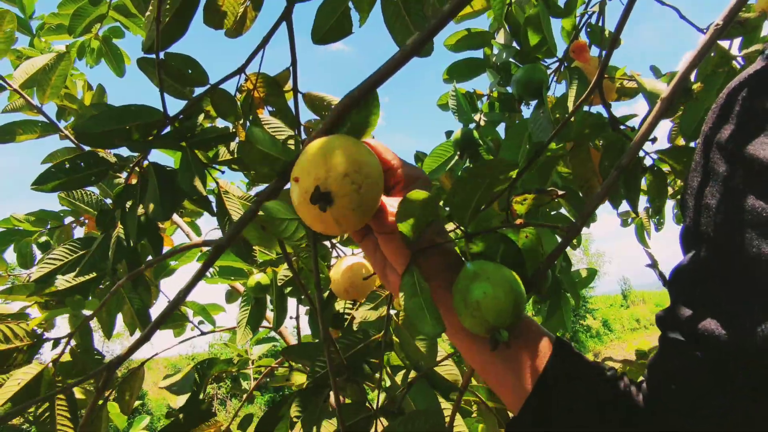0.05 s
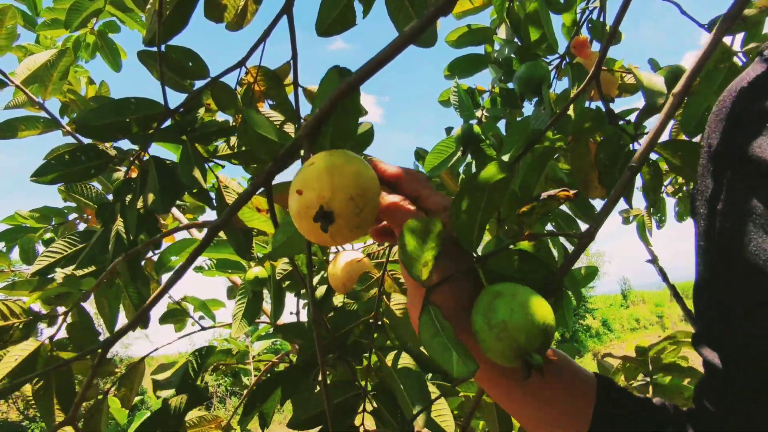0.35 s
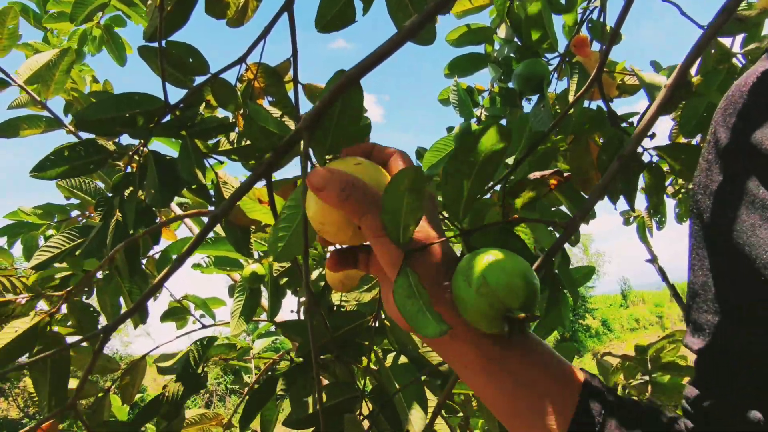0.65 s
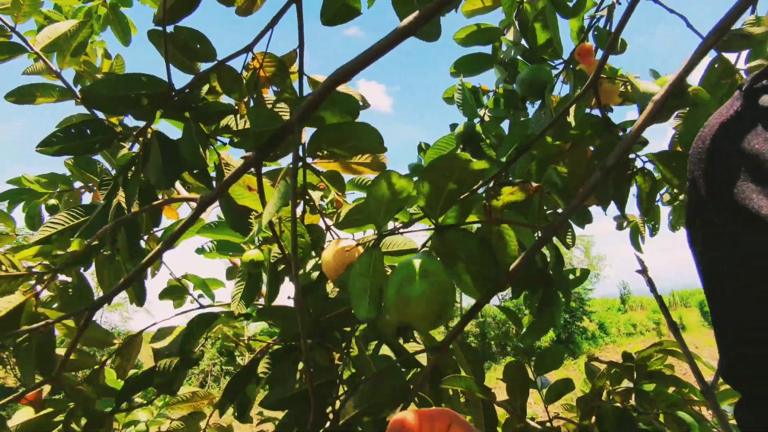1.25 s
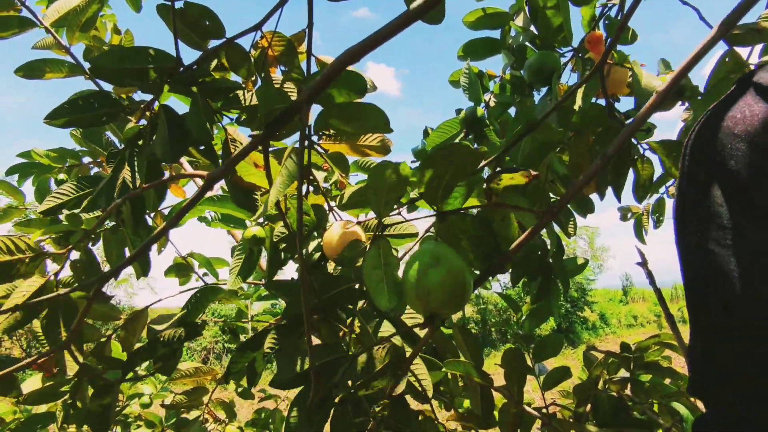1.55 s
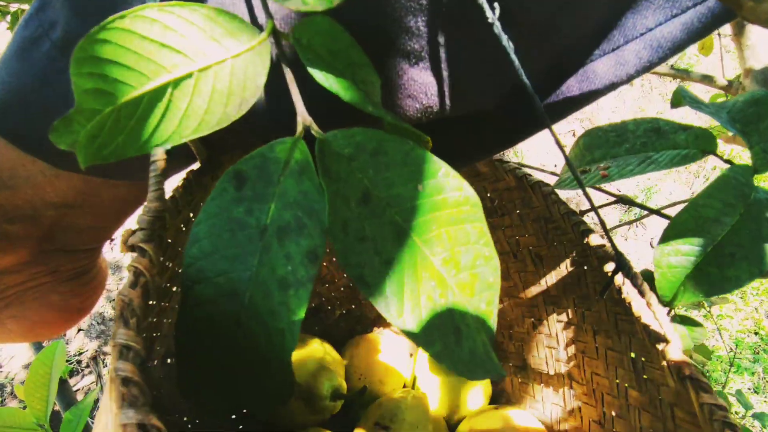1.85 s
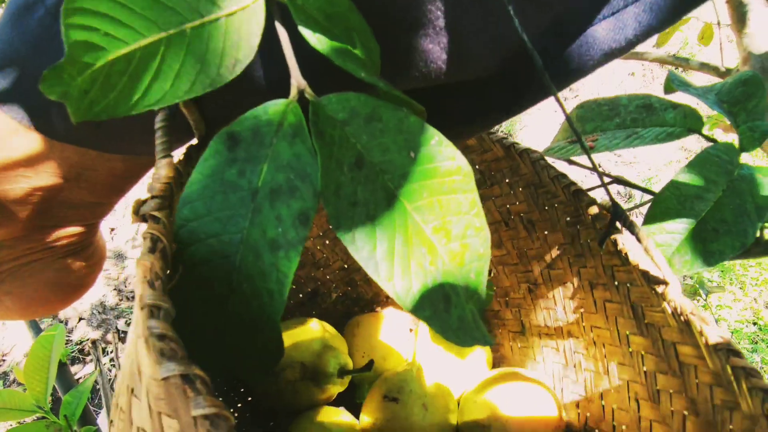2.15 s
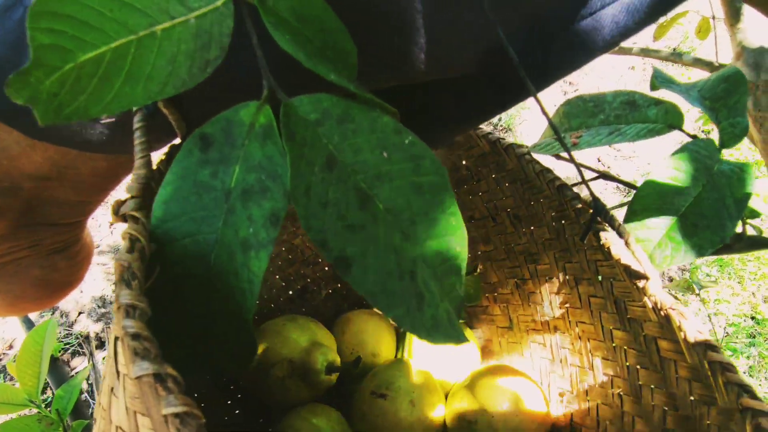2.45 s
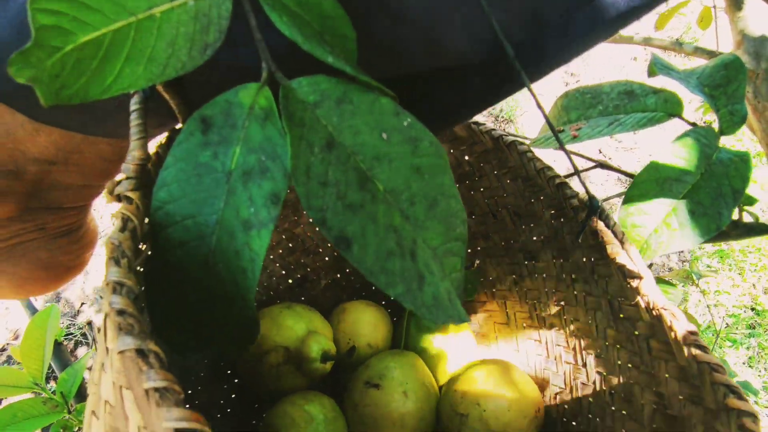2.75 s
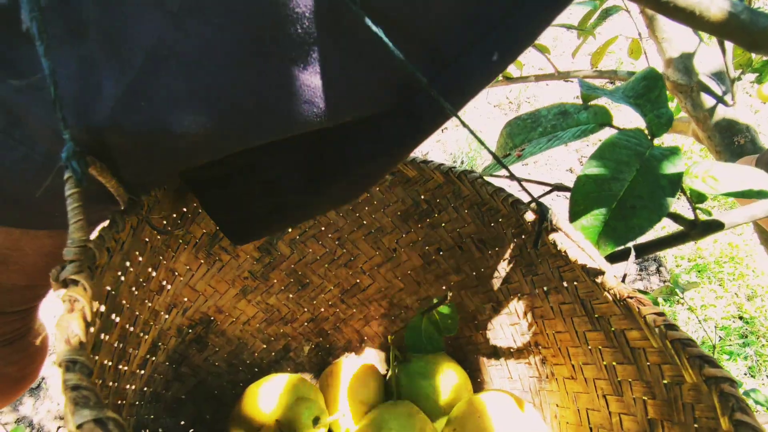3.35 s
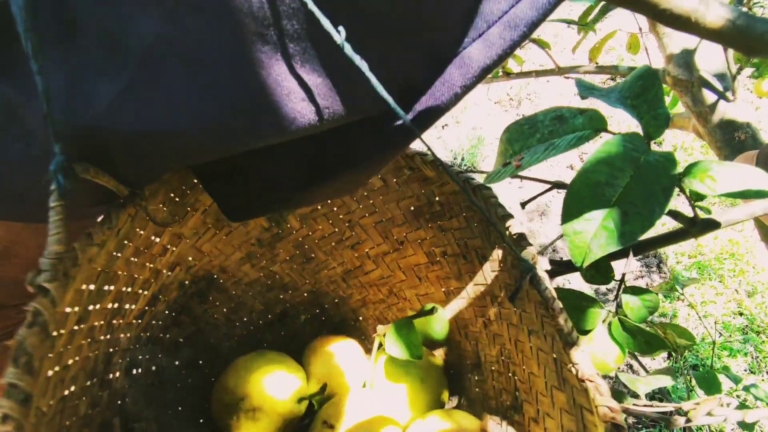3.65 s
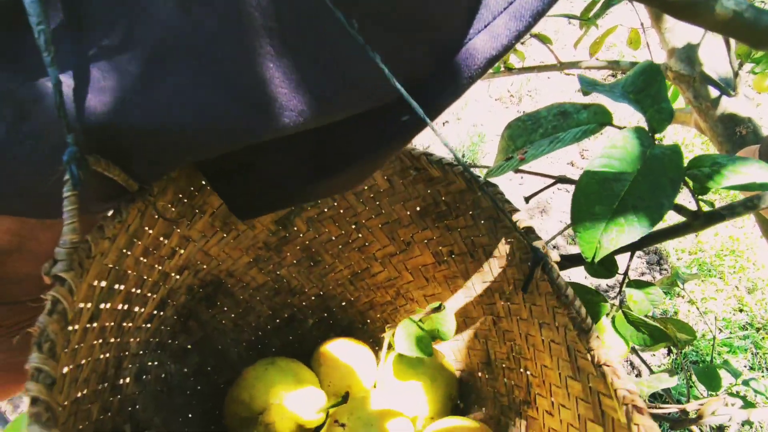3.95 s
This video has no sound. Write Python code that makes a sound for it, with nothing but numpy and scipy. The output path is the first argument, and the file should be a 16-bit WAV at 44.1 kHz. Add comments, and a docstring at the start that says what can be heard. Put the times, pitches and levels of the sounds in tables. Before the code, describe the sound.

Leaves rustle as fruit is picked, then fruit tumbles into a woven basket.

```python
"""Leaves rustle close by as a guava is twisted off: the stalk snaps and the branch swings back.
After a brief silence, leaves brush over a woven basket; after another, fruit tumbles in with
damped knocks, and the cane weave rings, crunches and ticks under the weight.
Rustle and crunch are surfaces catching and slipping; the sharp cracks are fibres letting go.
Behind it are open air and a faint far bird, all heard through two close microphone ports."""
import sys
import numpy as np
from scipy import signal
from scipy.fft import rfft, irfft
from scipy.io import wavfile
from scipy.ndimage import uniform_filter1d

SR = 44100
rng = np.random.default_rng(int(sys.argv[2]) if len(sys.argv) > 2 else 0)


def unload_wav(signal):
    """Save mono or channel-first audio to the path in sys.argv[1] as 16-bit WAV at rate SR, clipped to [-1, 1]."""
    wavfile.write(
        sys.argv[1],
        SR,
        np.round(np.clip(np.atleast_2d(signal).T, -1, 1) * 32767).astype(np.int16),
    )


N = 176400
T = np.arange(N) / SR
HZ = np.fft.rfftfreq(N, 1 / SR)

# Rustle envelopes, one per gesture (time [s], relative level [dB])
REACH = [(0.0, -73), (0.056, -64), (0.226, -51), (0.31, -69.5), (0.368, -64), (0.412, -55), (0.51, -68),
         (0.642, -59), (0.672, -68.5), (0.736, -64.5), (0.77, -52), (0.86, -50.5)]
PULL = [(0.89, -46.5), (0.94, -43.5), (0.98, -37.5), (0.99, -43.5), (1.044, -43.5), (1.056, -45),
        (1.126, -44.5), (1.162, -57.5), (1.206, -47.5), (1.298, -53)]
SWING = [(1.316, -44.5), (1.367, -50), (1.381, -44.5), (1.41, -48.5), (1.469, -60.5), (1.485, -54.5),
         (1.497, -61), (1.65, -62.5)]
BRUSH = [(1.73, -74.5), (1.9, -76), (1.97, -58), (2.09, -63), (2.15, -64.5), (2.4, -66), (2.48, -56.5),
         (2.56, -56.5), (2.63, -57), (2.69, -53.5), (2.78, -57.5), (2.86, -51.5), (3.02, -50.5),
         (3.05, -53), (3.13, -48.5)]
# Tone of leaves on the branch and over the basket (frequency [Hz], gain [dB])
BRANCH_EQ = [(60, -2), (200, -0.5), (500, -2), (900, -0.5), (1500, 2), (2100, -2), (2800, -0.5), (4500, 0),
             (12000, 0.5), (16000, -6.5)]
BRUSH_EQ = [(60, -19), (250, -14), (900, -1), (2000, -2.5), (3700, 2), (6000, 0.5), (9000, 0), (12000, 0),
            (16000, -10)]


def leaves():
    """Leaves rub on the pulled branch, then sweep over the basket."""
    branch = friction(REACH + PULL + SWING, BRANCH_EQ, grains_per_s=1300, grain_s=0.00075, spread_db=1,
                      slide_db=0, flutter_db=1.66, shimmer_db=3, shared_hz=1300, lead_s=0.00019,
                      crackle=fine_crackle())
    brush = friction(BRUSH, BRUSH_EQ, grains_per_s=1800, grain_s=0.00079, spread_db=1,
                     slide_db=-2.5, flutter_db=1.5, shimmer_db=2.5, shared_hz=1630, lead_s=-0.00012)
    picking = T < SILENCES[0][1]
    brushing = (T > SILENCES[0][1]) & (T < SILENCES[1][0])
    return amp(3.5) * branch * picking + amp([[1.5], [3]]) * brush * brushing


def fine_crackle(ticks_per_s=170, decay_s=0.0025, low_hz=2517, high_hz=12400, pitch_count=40):
    """A fine crackle of tiny ticks, each with a short ring at its own pitch."""
    out, t = np.zeros((2, N)), T[:1024]
    onsets = rng.random(N) < ticks_per_s / SR
    pitch_index = rng.integers(0, pitch_count, N)
    for k, hz in enumerate(np.geomspace(low_hz, high_hz, pitch_count)):
        ring = np.sin(2 * np.pi * (hz * t + rng.random((2, 1)))) * np.exp(-t / decay_s)
        tick = rng.standard_normal((2, len(t))) * np.exp(-2 * t / decay_s)
        for sample in np.flatnonzero(onsets & (pitch_index == k)):
            add(out, sample / SR, tick + 0.5 * ring)
    return amp(-7) * unit(out)


# Stalk and twig snaps (time [s], level [dB], pitch [Hz], decay [s], left over right [dB])
SNAPS = [(0.8724, -18, 1576, 0.0011, 0), (1.3029, -24, 1160, 0.00055, -1)]
# Tone of splintering wood (frequency [Hz], gain [dB])
SPLINTER_EQ = [(60, -11.5), (250, -4.5), (1000, 8), (1600, 5), (2400, -1.5), (3800, -10), (16000, -29.5)]


def stalk_snaps(lead_s=0.0002, tail_db=-18, tail_s=0.013):
    """Green wood breaks with a short pop and a splintering tail."""
    out, t = np.zeros((2, N)), T[:4096]
    age = np.maximum(t - np.array([[0], [lead_s]]), 0)  # the pop reaches the left port first
    splinters = colour(stereo(rng.standard_normal((2, N)), shared_hz=480), SPLINTER_EQ)
    for start, db, hz, decay_s, pan_db in SNAPS:
        pop = -damped_sine(age, hz, decay_s)
        tail = unit(splinters[:, round(start * SR):][:, :len(t)]) * np.exp(-t / tail_s)
        add(out, start, pan(db, pan_db) * (pop + amp(tail_db) * tail))
    return out


# Cracks of leaf, stalk and cane
# (time [s], relative level [dB], ring pitch [Hz], ring mix [dB], decay [s], left over right [dB])
CRACKS = [(.8725, -31.5, 9700, -3, 0.0052, -0.5), (0.922, -40.5, 3750, 2, 0.0032, 10),
          (1.1214, -41.5, 4600, 3, 0.0085, 2), (1.219, -36.5, 1590, -8, 0.0042, -0.5),
          (1.3029, -36.5, 3500, 0, 0.002, 12), (1.484, -46.5, 12100, 2.5, 0.0026, -9),
          (2.46, -48.5, 4300, -8, 0.0083, 5), (2.8313, -36, 10900, -22, 0.0037, -8),
          (2.929, -44.5, 3570, 5, 0.0047, 3), (2.9867, -35, 3900, -15, 0.0099, 1),
          (3.217, -60, 13000, 7, 0.017, -1.5), (3.284, -50.5, 12000, -17, .003, -11),
          (3.5606, -31.5, 2130, 4.5, 0.002, -1), (3.5753, -25.5, 12900, -6, 0.0009, 0),
          (3.6115, -34, 7100, 1, 0.0023, 1), (3.6349, -30, 4650, 3, 0.0015, 10.5),
          (3.638, -13.5, 4640, -10, 0.002, 7), (3.6388, -21.5, 11760, -4.5, 0.0061, -10.5),
          (3.7535, -38.5, 5560, -2, 0.00093, 8), (3.767, -39, 6000, -8, .001, 3),
          (3.8065, -39, 5480, 0.5, 0.001, 4.5), (3.87, -43.5, 1400, -8, 0.005, -3),
          (3.8858, -31, 7560, -3.5, .0013, 2), (3.9324, -27, 9900, -4.5, 0.0015, 2.5),
          (3.977, -34, 6600, -3.5, 0.0019, 4)]
# Tone shared by the cracks (frequency [Hz], gain [dB])
CRACK_EQ = [(60, -3.5), (300, -9.5), (1000, -8.5), (1600, -3.5), (2100, -4.5), (3700, -8), (4600, -4.5),
            (5500, -5.5), (6700, -2), (9000, -2.5), (11800, -3.5), (14000, 0.5), (15500, 0)]
ATTACK_S = 0.00019


def fibre_cracks(tail_db=-18, tail_s=0.011, relative_bandwidth=0.18):
    """Fibres let go in a short burst with one broad ring and a scattered tail."""
    out, t = np.zeros((2, N)), T[:4096]
    freqs = np.fft.rfftfreq(len(t), 1 / SR)
    for start, db, hz, ring_db, decay_s, pan_db in CRACKS:
        burst = rng.standard_normal((2, len(t)))
        ring = unit(irfft(rfft(burst) / (1 + 2j * (freqs - hz) / (relative_bandwidth * hz))))
        attack = np.minimum(t / ATTACK_S, 1)
        decay = np.exp(-t / decay_s) + amp(tail_db) * np.exp(-t / tail_s)
        add(out, start, pan(db, pan_db) * attack * decay * (burst + amp(ring_db) * ring))
    return colour(stereo(out, shared_hz=1500), CRACK_EQ)


# Knocks and soft blows of fruit, hand and branch (time [s], level [dB], pitch [Hz], decay [s])
THUDS = [(0.153, -44.5, 430, 0.0044), (0.243, -44, 1530, .003), (0.883, -42, 240, 0.007),
         (1.159, -37.5, 95, 0.012), (1.619, -40, 129, 0.0057), (2.2, -49, 900, 0.0027),
         (3.105, -35, 104, 0.0044), (3.5468, -18.5, 687, 0.0015), (3.5603, -24.5, 610, 0.0012),
         (3.5754, -19, 253, 0.0017), (3.5821, -23.5, 176, 0.0028), (3.6297, -21, 465, 0.00059),
         (3.6385, -22.5, 300, 0.0019), (3.6764, -23.5, 152, 0.0046)]
# Body resonances of the loaded basket (pitch [Hz], level relative to the blow [dB], decay [s])
BASKET_MODES = [(100.4, -13, 0.024), (137.5, -15, 0.015), (272.6, -25, 0.013), (395, -23.5, 0.014),
                (673, -17.5, 0.006), (792, -27, 0.0085)]


def thuds(lead_s=0.00014, low_cut_hz=60):
    """Each blow is a heavily damped push; those in the basket set it ringing."""
    out, t = np.zeros(N), T[:8192]
    body = sum(amp(db) * damped_sine(t, hz, decay_s) for hz, db, decay_s in BASKET_MODES)
    for start, db, hz, decay_s in THUDS:
        in_basket = start > SILENCES[0][1]
        add(out, start, -amp(db) * (damped_sine(t, hz, decay_s) + body * in_basket))
    left = signal.sosfilt(signal.butter(2, low_cut_hz, "high", fs=SR, output="sos"), out)
    right = np.interp(T - lead_s, T, left)
    return np.array([left, right])


# Crunch envelopes of the basket, carried and then loaded (time [s], relative level [dB])
CARRY = [(3.2, -72), (3.28, -62), (3.42, -77), (3.455, -56.5), (3.5, -73), (3.535, -77)]
LOAD = [(3.544, -56), (3.548, -34), (3.578, -37), (3.592, -40.5), (3.628, -46), (3.648, -41.5),
        (3.675, -39.5), (3.7, -51.5), (3.8, -59), (3.945, -69), (3.965, -49), (4.0, -55)]
# Tone of the straining weave (frequency [Hz], gain [dB])
WEAVE_EQ = [(60, -2), (200, 17), (600, -4), (1200, 3.5), (2000, 7), (4000, 1), (6500, 5.5), (9000, 3),
            (16000, 4.5)]


def weave_crunch():
    """Cane strips grind over each other as the basket takes the weight."""
    grind = friction(CARRY + LOAD, WEAVE_EQ, grains_per_s=2600, grain_s=0.0012, spread_db=5,
                     slide_db=-4.5, flutter_db=0.5, shimmer_db=0.5, shared_hz=1280, lead_s=0.00027)
    return amp([[2], [-1]]) * grind * (T > SILENCES[1][1])


# Bright resonances of one basket strip (pitch [Hz], relative level [dB], decay [s])
CANE_MODES = [(4514, -4.5, 0.0035), (4670, -3.5, 0.0035), (6600, 0.5, 0.0029), (8750, -17, 0.0036),
              (11570, -6, 0.0036), (13130, 5, 0.0027), (15500, 4, .003)]


def cane_tick(start=3.6382, strike_db=-21.5):
    """The fruit knocks one stiff cane, which rings briefly with different phases at each port."""
    out, t = np.zeros((2, N)), T[:4096]
    phases = rng.random((len(CANE_MODES), 2, 1))
    ring = sum(amp(db) * damped_sine(t, hz, decay_s, phase)
               for (hz, db, decay_s), phase in zip(CANE_MODES, phases))
    add(out, start, amp(strike_db) * np.minimum(t / ATTACK_S, 1) * ring)
    return out


# Bird notes (time [s], length [s], start pitch [Hz], end pitch [Hz], level [dB])
CHIRPS = [(3.248, 0.066, 1820, 1674, -68), (3.508, 0.038, 2550, 2150, -57),
          (3.821, 0.065, 2550, 2280, -57.5), (3.915, 0.034, 2370, 2600, -54.5),
          (3.94, 0.023, 1500, 1320, -60)]


def far_bird(blur_hz=110):
    """Thin gliding notes from far off, blurred in level and pitch by the trees."""
    notes = np.zeros(N, complex)
    for start, length_s, start_hz, end_hz, db in CHIRPS:
        progress = np.linspace(0, 1, int(length_s * SR))
        cycles = np.cumsum(start_hz + (end_hz - start_hz) * progress) / SR
        add(notes, start, amp(db) * np.sin(np.pi * progress) * np.exp(2j * np.pi * cycles))
    return np.array([(notes * (wander(blur_hz) + 1j * wander(blur_hz))).real for port in range(2)])


# Tone of the outdoor bed (frequency [Hz], gain [dB])
AIR_EQ = [(20, -42), (45, -12.5), (70, 8), (120, 3.5), (220, -4), (500, -11), (1000, -15.5), (2500, -17.5),
          (6000, -20.5), (16000, -26.5)]
# Envelope of the outdoor bed (time [s], relative level [dB])
AIR_LEVEL = [(0, -59.5), (1.2, -60.5), (1.65, -54.5), (1.73, -66.5), (1.95, -58.5), (3.13, -59), (3.2, -71),
             (3.45, -58.5), (4.0, -58.5)]


def open_air():
    """A low, gently uneven outdoor hush, part centred and part wide."""
    centred = unit(colour(stereo(rng.standard_normal((2, N)), shared_hz=660), AIR_EQ))
    wide = unit(colour(rng.standard_normal((2, N)), AIR_EQ))
    return (centred + amp(1) * wide) * envelope(AIR_LEVEL) * amp(0.91 * wander(42))


def friction(curve, eq, grains_per_s, grain_s, spread_db, slide_db, flutter_db, shimmer_db,
             shared_hz, lead_s, crackle=0., spot_count=24):
    """Surfaces catch and slip: tiny snaps, each spot with its own ring, over a sliding hiss."""
    grains, t = np.zeros((2, N)), T[:512]
    strength = amp(spread_db * np.minimum(rng.exponential(1, N), 3))
    slips = strength * (rng.random(N) < grains_per_s / SR)
    spot = rng.integers(0, spot_count, N)
    for k in range(spot_count):
        ring = rng.standard_normal((2, len(t))) * np.exp(-t / grain_s)
        grains += signal.oaconvolve((slips * (spot == k))[None], unit(ring), axes=1)[:, :N]
    hiss = amp(slide_db) * rng.standard_normal((2, N))
    rub = shimmer(unit(unit(grains) + hiss), shimmer_db)
    rub = colour(stereo(rub + crackle, shared_hz, lead_s), eq)
    return unit(rub * amp(flutter_db * wander(40))) * envelope(curve)


def shimmer(x, depth_db, patch_s=0.038, patch_hz=430):
    """The tone flickers as ever-changing bands swell and dip."""
    bands = signal.stft(x, nperseg=512, noverlap=384)[2]
    patches = rng.standard_normal(bands.shape[1:])
    patches = uniform_filter1d(patches, round(patch_hz * 512 / SR), axis=0)
    patches = uniform_filter1d(patches, round(patch_s * SR / 128), axis=1)
    return signal.istft(bands * amp(depth_db * unit(patches)), nperseg=512, noverlap=384)[1][:, :N]


def amp(db):
    """Decibels to gain."""
    return 10 ** (np.asarray(db) / 20)


def pan(db, pan_db):
    """Left and right gains, pan_db apart."""
    return amp([[db + pan_db / 2], [db - pan_db / 2]])


def unit(x):
    """Scales to rms 1."""
    return x / np.sqrt(np.mean(x ** 2) + 1e-20)


def envelope(curve):
    """Gain over time from (time [s], level [dB]) points."""
    return amp(np.interp(T, *np.transpose(curve)))


def damped_sine(t, hz, decay_s, phase=0):
    """One struck resonance dying away; phase is in cycles."""
    return np.exp(-t / decay_s) * np.sin(2 * np.pi * (hz * t + phase))


def colour(x, eq):
    """Minimum-phase EQ through (frequency [Hz], gain [dB]) points."""
    hz, db = np.transpose(eq)
    log_hz = np.log(abs(np.fft.fftfreq(N, 1 / SR)) + 1)
    log_gain = np.log(amp(np.interp(log_hz, np.log(hz + 1), db)))
    response = np.exp(np.conj(signal.hilbert(log_gain)))[:len(HZ)]
    return irfft(rfft(x) * response, N)


def stereo(x, shared_hz, lead_s=0):
    """Two unrelated signals come to share their bass, which the left port hears lead_s earlier."""
    left, other = rfft(x)
    shared = 1 / (1 + (HZ / shared_hz) ** 2)
    right = shared * left * np.exp(-2j * np.pi * HZ * lead_s) + np.sqrt(1 - shared ** 2) * other
    return irfft(np.array([left, right]), N)


def wander(rate_hz):
    """Smooth random motion of rms 1."""
    return unit(irfft(rfft(rng.standard_normal(N)) / (1 + (HZ / rate_hz) ** 4), N))


def add(mix, start, sound):
    """Mixes a sound in at start seconds."""
    part = mix[..., max(round(start * SR), 0):][..., :sound.shape[-1]]
    part += sound[..., :part.shape[-1]]


def scene():
    """All sources at the two ports."""
    return (leaves() + stalk_snaps() + weave_crunch() + fibre_cracks() + cane_tick() + thuds()
            + far_bird() + open_air())


# Tone of the microphone ports (frequency [Hz], left gain [dB], right gain [dB])
PORT_EQ = [(62.5, -7.5, -10.5), (327, 1, 0.5), (810, 1.5, 1), (1500, 0.5, -2.5), (2150, 0, -1),
           (3500, 1, -0.5), (4600, 3.5, 2), (5050, 0, -2.5), (6800, 0.5, 1), (6960, -8.5, -6),
           (8320, 2, -7), (9060, 7, -3), (10300, -0.5, 0), (10740, -1, 3.5), (11620, 2, 4),
           (11660, -5.5, 7.5), (13100, -0.5, 1.5), (15500, -11, 0.5)]
# Mutes between picking, brushing and loading (start [s], end [s])
SILENCES = [(1.658, 1.725), (3.135, 3.191)]


def record(dry, high_cut_hz=15900):
    """Each port colours the sound, the mix mutes briefly twice, and the top treble is filtered off."""
    eq = np.array(PORT_EQ)
    heard = np.array([colour(dry[0], eq[:, [0, 1]]), colour(dry[1], eq[:, [0, 2]])])
    muted = sum((T > start) & (T < end) for start, end in SILENCES)
    gate = uniform_filter1d(1. - muted, size=64)  # soft edges avoid clicks
    lowpass = signal.firwin(255, high_cut_hz, window=("kaiser", 7), fs=SR)
    return signal.oaconvolve(heard * gate, lowpass[None], "same")


dry = scene()
out = record(dry)
unload_wav(out)
```